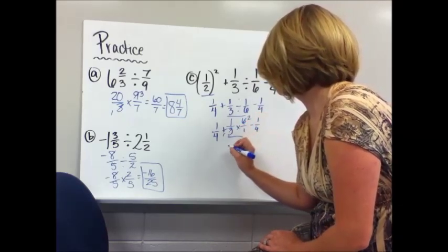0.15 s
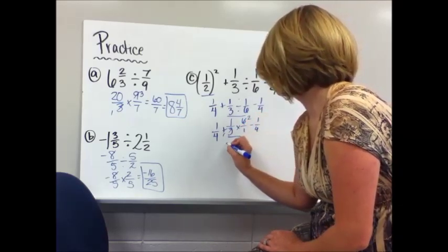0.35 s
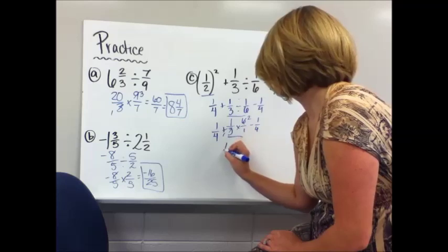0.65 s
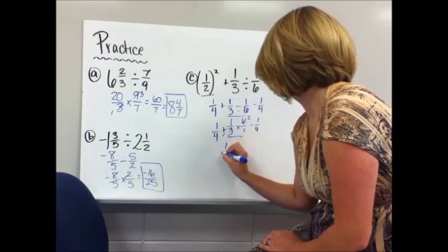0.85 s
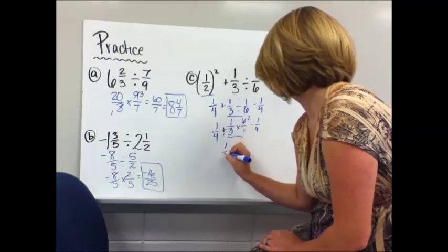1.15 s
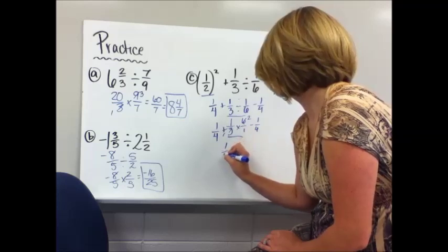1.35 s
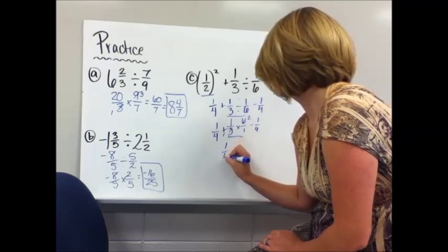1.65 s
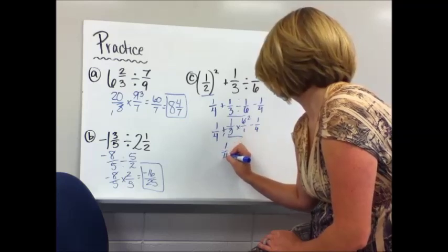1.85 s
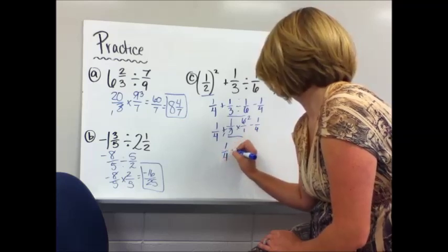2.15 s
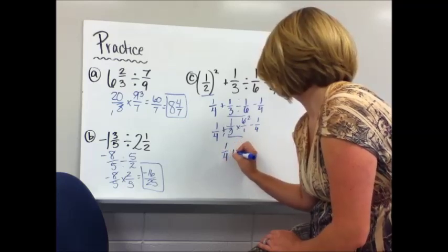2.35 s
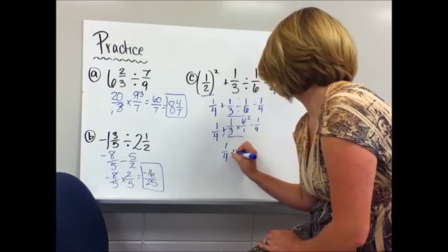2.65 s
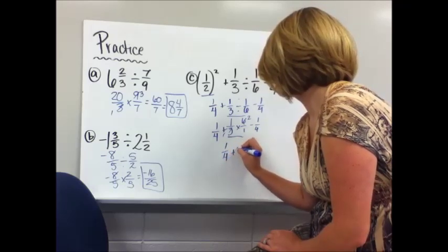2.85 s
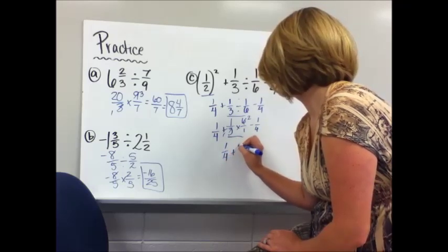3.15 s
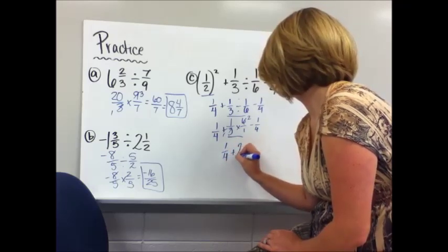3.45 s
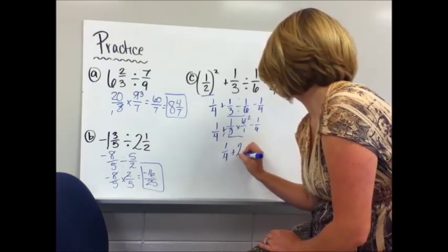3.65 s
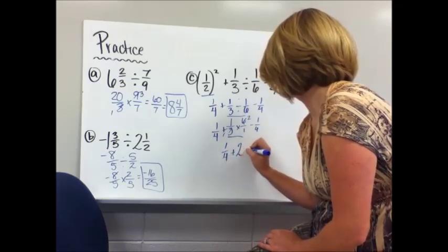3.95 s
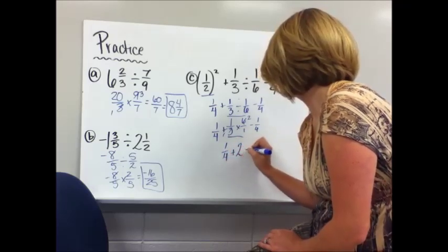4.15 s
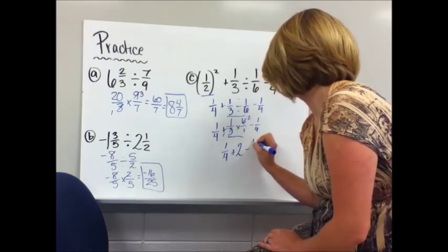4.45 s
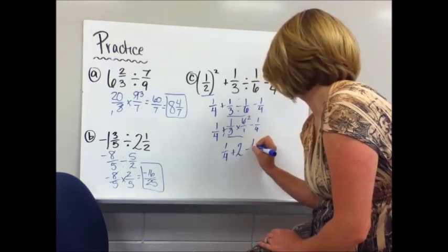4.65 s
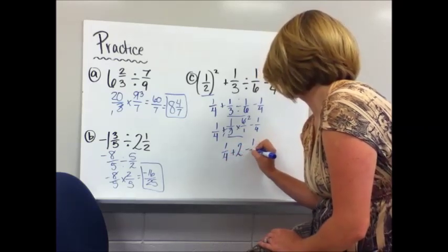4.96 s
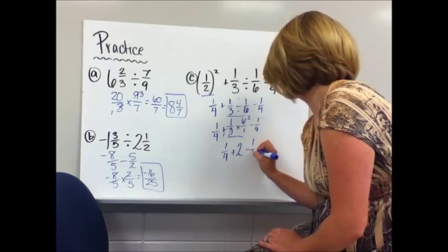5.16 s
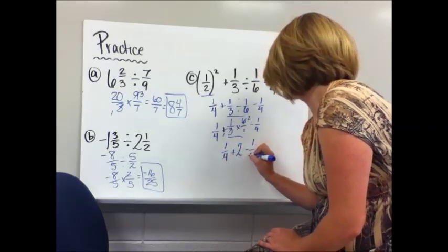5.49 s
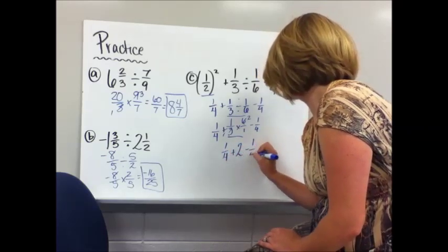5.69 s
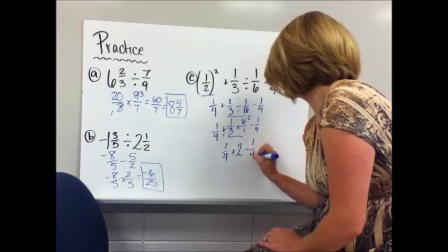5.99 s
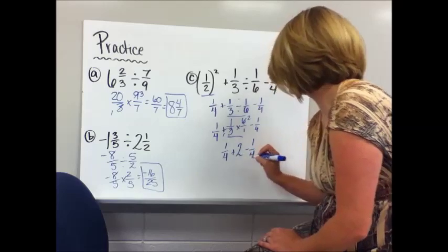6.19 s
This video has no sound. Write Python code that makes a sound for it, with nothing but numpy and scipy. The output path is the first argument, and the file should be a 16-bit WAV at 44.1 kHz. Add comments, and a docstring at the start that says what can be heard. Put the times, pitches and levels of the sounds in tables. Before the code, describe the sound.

Soft hollow marker knocks and faint high felt swishes on a whiteboard, unevenly spaced, above a steady low fan rumble in a quiet room.

```python
"""Marker on a whiteboard

A felt marker writes a few digits on a wall whiteboard in a quiet classroom.
Each touch of the tip is a soft knock: a short push sets the panel's tones ringing.
Each stroke is a thin, high hiss: random slips of the felt, shaped by the speed of the hand.
Ventilation hums and rumbles underneath (steady tones, shaped noise), with a faint electronic whine."""
import sys
import numpy as np
from scipy import signal
from scipy.fft import rfft, irfft
from scipy.io import wavfile
from scipy.ndimage import uniform_filter1d

SR = 44100
rng = np.random.default_rng(int(sys.argv[2]) if len(sys.argv) > 2 else 0)


def put_to_file(sound):
    """Save the sound as 16-bit audio at rate SR, in the file named by the first command-line argument."""
    columns = np.atleast_2d(sound).T  # one column per channel
    safe = np.clip(columns, -1, 1)
    whole_steps = np.round(safe * 32767)
    wavfile.write(sys.argv[1], SR, whole_steps.astype(np.int16))


N = 279020

# The tip lands on the panel: middle_of_push_s, level_db (rms of the knock's first 40 ms)
TIP_TOUCHES = [(0.6126, -54), (1.029, -50.5), (1.4847, -49), (2.492, -47.5), (2.8137, -41), (3.2503, -51.5),
               (4.2238, -52), (4.604, -55), (5.065, -52), (5.476, -54)]
# The panel's ringing tones: pitch_hz, level_db (relative, before the chance of each spot),
# fade_s (time to fall 60 dB)
PANEL_TONES = [(206.7, -8.5, .14), (230, -9.5, 0.31), (304, -12, 0.24), (356, -9.5, 0.19),
               (421, -11.5, 0.1), (463.4, -3.5, 0.11), (473.7, -5.5, 0.17), (600, -13, 0.065),
               (616, -5, 0.071), (658, -9, 0.09), (692, -2.5, 0.042), (820, -24, 0.07), (1150, -21, 0.031),
               (1410, 1, 0.042)]
# The felt slides: start_s (after easing in), length_s (without the easing),
# level_db (of the hiss, before MID_STROKE_DB and the hand's speed), hiss_centre_hz
FELT_STROKES = [(0.652, 0.12, -67.5, 13900), (1.096, 0.1, -73, 13100), (1.551, 0.11, -71, 13200),
                (2.035, 0.13, -64.5, 13300), (2.486, 0.12, -73, 13510), (2.808, 0.03, -76, 13700),
                (2.846, 0.036, -75, 13600), (3.322, 0.1, -71, 13500), (3.453, 0.23, -62, 14200),
                (3.737, 0.048, -73, 13800), (3.827, 0.081, -78, 13600), (4.287, 0.074, -75, 13700),
                (4.617, 0.116, -68.5, 13700), (5.116, 0.116, -73, 13700), (5.57, 0.099, -72.5, 13600),
                (5.858, 0.124, -72, 13800), (6.01, 0.14, -63, 13600)]
# Colour of the felt's broad rub: pitch_hz, level_db (per Hz, relative)
RUB_COLOUR = [(1000, 1), (3000, -5), (5200, 0), (5800, -1.5), (6600, -4), (8000, 1), (9500, -6.5),
              (12000, -14), (14500, -14), (15500, -14)]
# Colour of the air ducts' rumble: pitch_hz, level_db (per Hz, relative)
DUCT_COLOUR = [(20, -23.5), (48, -14.5), (68, -13), (87, 0.5), (100, -5), (115, -8), (160, -18.5),
               (225, -21), (270, -27), (450, -34.5), (530, -35), (700, -34), (850, -43.5), (1500, -53.5)]
# Colour of the microphone's steady hiss: pitch_hz, level_db (per Hz, relative)
HISS_COLOUR = [(100, 6), (1000, 7), (1600, 4.5), (2500, 1.5), (5000, -0.5), (9500, -1), (11500, -0.5),
               (13200, 2.5), (14500, 1), (15600, -1)]
# Fan motor and mains hum: pitch_hz, level_db (rms)
HUM_TONES = [(59.2, -53.5), (119.9, -53), (177.4, -72.5), (239.5, -84), (474, -81)]
# Thin whine of the electrics: pitch_hz, level_db (rms)
WHINE_TONES = [(888.9, -81), (1333.4, -97.5), (1559.5, -83), (1777.8, -91), (2666.7, -96), (3111.1, -99.5),
               (3555.6, -97), (5777.8, -96.5), (8000, -100), (11111.1, -99), (12888.9, -100)]
# The classroom's echo: pitch_hz, fade_s (time to fall 60 dB)
ROOM_FADES = [(150, 0.95), (600, 0.35), (3000, 0.63), (14000, 0.11)]
# Slow bending waves come back from the panel's edges: delay_s (on average),
# level_db (relative, before returns_db is added)
EDGE_RETURNS = [(.0092, -21), (0.012, -15.5), (0.023, -6), (.028, -15)]

TOP_HZ = 15740  # the whole sound is cut off above this pitch
# a harder touch is shorter, so brighter, and swings the spot under the tip further
USUAL_TOUCH_DB, CONTACT_MS, SHORTER_MS_PER_DB = -49, 2.25, 0.11
SWING_DB, SWING_GROWTH = 3, 0.7  # swing against the ringing at the usual touch; dB per dB of touch
TICK_FALL = 0.69  # the tick stands out less in a hard touch: dB per dB of touch
# the hand eases in before and out after each stroke; the hiss peaks in the middle
EASE_IN_S, EASE_OUT_S, SPEED_SHAPE, MID_STROKE_DB = 0.024, 0.03, 0.86, -1
# the broad rub grows far less than the hiss, so light strokes sound duller
USUAL_STROKE_DB, RUB_DB, RUB_GROWTH = -75, -78.5, 0.34  # growth in dB per dB of stroke


def knocks(swing_hz=640, swing_fade_s=0.019, spot_db=2.5, radiates_above_hz=280,
           returns_below_hz=350, returns_db=7, tick_db=-15, tick_fade_s=0.085, tick_below_hz=1100):
    """The soft tip pushes the panel: the spot swings quickly, and the panel's tones ring on."""
    t = np.arange(SR // 2) / SR
    out = np.zeros(N)
    swing = gain_of(-60 * t / swing_fade_s) * np.sin(2 * np.pi * swing_hz * t)
    for middle_s, level_db in TIP_TOUCHES:
        harder_db = level_db - USUAL_TOUCH_DB
        contact_ms = max(CONTACT_MS - SHORTER_MS_PER_DB * harder_db, 0.5)
        swing_db = SWING_DB + SWING_GROWTH * harder_db

        # every spot on the panel favours slightly different tones
        ring = np.zeros(len(t))
        for pitch_hz, tone_db, fade_s in PANEL_TONES:
            here_db = tone_db + spot_db * rng.standard_normal()
            ring += gain_of(here_db - 60 * t / fade_s) * np.cos(2 * np.pi * pitch_hz * t)

        # the wave front runs out to the frame and comes back dull
        front = filtered(ring * np.exp(-(t / 0.0061) ** 2), returns_below_hz, "lowpass")
        for delay_s, return_db in EDGE_RETURNS:
            varied_s = delay_s * (1 + 0.032 * rng.standard_normal())
            add(ring, varied_s, gain_of(returns_db + return_db) * front)

        # the push swells and eases off once, then stays at zero
        force = np.sin(np.pi * np.minimum(t * 1000 / contact_ms, 1)) ** 2
        motion = signal.fftconvolve(ring + gain_of(swing_db) * swing, force)[:len(t)]
        # a thin panel radiates its slow bending poorly
        knock = filtered(motion, radiates_above_hz, "highpass", order=1)
        knock = knock / np.std(knock[t < 0.04])

        # the fibres crush with a faint tick, which builds up during the push
        crush = evened(filtered(rng.standard_normal(len(t)), tick_below_hz, "lowpass"))
        tick_gain = gain_of(tick_db - TICK_FALL * harder_db - 60 * t / tick_fade_s)
        tick = crush * tick_gain * np.cumsum(force) / force.sum()
        push_start_s = middle_s - contact_ms / 2000  # half the contact time earlier
        add(out, push_start_s, gain_of(level_db) * (knock + tick))
    return out


def strokes(slips_per_s=9000, slip_spread_db=0.2, width_hz=3100, patchy_db=4.0):
    """Felt fibres catch and slip; the hand speeds up and slows down again in each stroke."""
    slips = rng.standard_normal(N) * (rng.random(N) < slips_per_s / SR)
    slips *= gain_of(slip_spread_db * np.minimum(rng.exponential(1, N), 4))

    # the colour shifts in patches as the tip rolls onto other fibres
    spectrum = signal.stft(slips, nperseg=256)[2]
    patches = uniform_filter1d(rng.standard_normal(spectrum.shape), size=4, axis=0)  # over pitch
    patches = evened(uniform_filter1d(patches, size=12, axis=1))  # over time
    slips = signal.istft(spectrum * gain_of(patchy_db * patches), nperseg=256)[1]

    out = np.zeros(N)
    for start_s, length_s, level_db, centre_hz in FELT_STROKES:
        whole_s = EASE_IN_S + length_s + EASE_OUT_S
        fibres = slips[round(start_s * SR):][:round(whole_s * SR)]
        speed = np.hanning(len(fibres)) ** SPEED_SHAPE
        hiss = gain_of(level_db + MID_STROKE_DB) * resonance(fibres, centre_hz, width_hz)
        rub_db = RUB_DB + RUB_GROWTH * (level_db - USUAL_STROKE_DB)
        rub = gain_of(rub_db) * coloured(fibres, RUB_COLOUR)
        add(out, start_s - EASE_IN_S, speed * (hiss + rub))
    return out


def room(x, first_s=0.0071):
    """Diffuse reflections from the walls, each band of pitches dying at its own speed."""
    taps = rng.standard_normal(SR) * (np.arange(SR) > first_s * SR)
    hz, t, spectrum = signal.stft(taps, SR, nperseg=256)
    fade = gain_of(-60 * t / read(ROOM_FADES, hz)[:, None])
    tail = signal.istft(spectrum * fade, SR, nperseg=256)[1]
    return signal.fftconvolve(x, tail / np.linalg.norm(tail))[:N]


def background(ducts_db=-50.5, hiss_db=-70.5, ducts_top_hz=1600):
    """Duct rumble and hiss are shaped noise; motor hum and whine are steady tones."""
    rumble = filtered(coloured(rng.standard_normal(N), DUCT_COLOUR), ducts_top_hz, "lowpass")
    hiss = coloured(rng.standard_normal(N), HISS_COLOUR)
    hum = tones(HUM_TONES, waver=0.058, waver_hz=3.7)
    whine = tones(WHINE_TONES, waver=0.2, waver_hz=5.7)
    return gain_of(ducts_db) * rumble + gain_of(hiss_db) * hiss + hum + whine


def tones(table, waver, waver_hz):
    """Steady tones that waver a little in level and phase."""
    t = np.arange(N) / SR
    out = np.zeros(N)
    for pitch_hz, level_db in table:
        level = gain_of(level_db) * np.sqrt(2) * (1 + waver * drift(waver_hz))  # rms to peak
        phase = 2 * np.pi * (pitch_hz * t + rng.random()) + waver * drift(waver_hz)
        out += level * np.sin(phase)
    return out


def drift(rate_hz):
    """Slow random wandering, at rms 1."""
    hz = np.fft.rfftfreq(N, 1 / SR)
    return evened(irfft(rfft(rng.standard_normal(N)) * np.exp(-(hz / rate_hz) ** 2), N))


def resonance(x, centre_hz, width_hz):
    """Favours a broad band around one pitch (half amplitude at its edges), at rms 1."""
    hz = np.fft.rfftfreq(len(x), 1 / SR)
    return evened(irfft(rfft(x) / (1 + (2 * (hz - centre_hz) / width_hz) ** 2), len(x)))


def coloured(x, points):
    """Shapes the spectrum of x by a table, at rms 1."""
    shape = gain_of(read(points, np.fft.rfftfreq(len(x), 1 / SR)))
    return evened(irfft(rfft(x) * shape, len(x)))


def filtered(x, hz, kind, order=2):
    """A plain high-pass or low-pass."""
    return signal.sosfilt(signal.butter(order, hz, kind, fs=SR, output="sos"), x)


def read(points, hz):
    """Reads between the rows of a table, on a log-frequency axis."""
    table_hz, value = np.transpose(points)
    return np.interp(np.log(hz + 1), np.log(table_hz + 1), value)


def gain_of(db):
    """Decibels to amplitude."""
    return 10 ** (np.asarray(db) / 20)


def evened(x):
    """Scales to rms 1."""
    return x / np.sqrt(np.mean(x ** 2) + 1e-20)


def add(mix, start_s, sound):
    """Mixes a sound into mix at a given time."""
    part = mix[max(round(start_s * SR), 0):][:len(sound)]
    part += sound[:len(part)]


def scene(knock_room_db=-12.5, stroke_room_db=-10):
    """The marker on the board, its echo, and the background."""
    knock = knocks()
    stroke = strokes()
    echo = room(gain_of(knock_room_db) * knock + gain_of(stroke_room_db) * stroke)
    return (knock + stroke + echo + background())[None]


def record(dry):
    """Cuts off the highest treble steeply."""
    lowpass = signal.firwin(1023, TOP_HZ, window=("kaiser", 9), fs=SR)
    return signal.oaconvolve(dry, lowpass[None], "same")


dry = scene()
out = record(dry)
put_to_file(out)
```